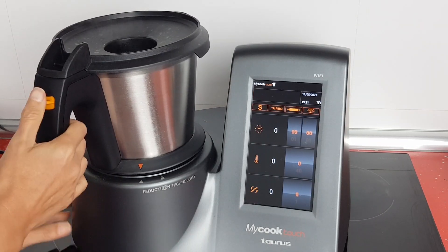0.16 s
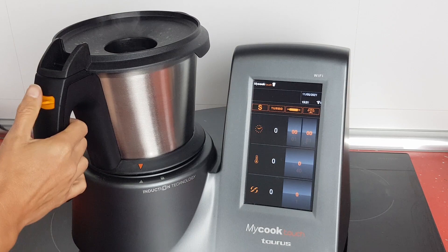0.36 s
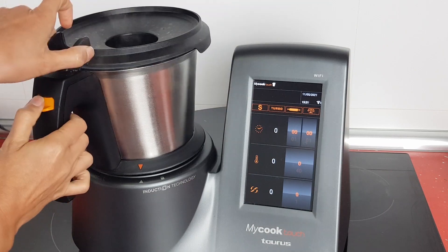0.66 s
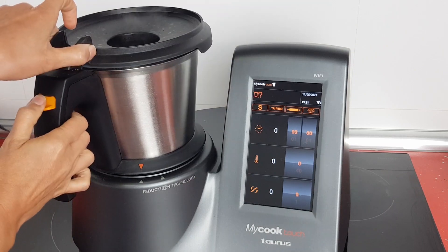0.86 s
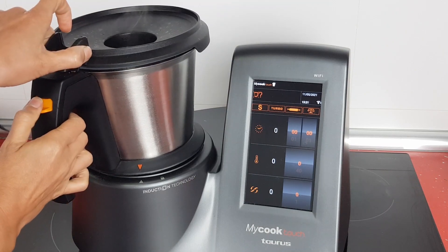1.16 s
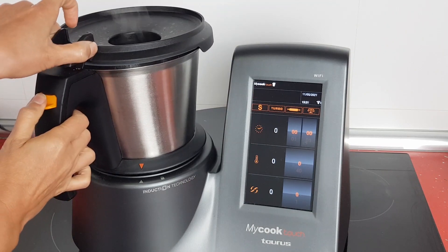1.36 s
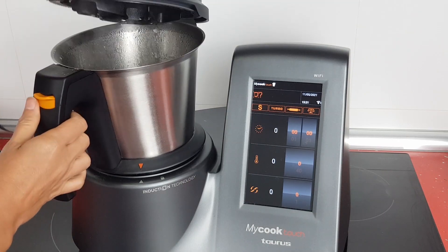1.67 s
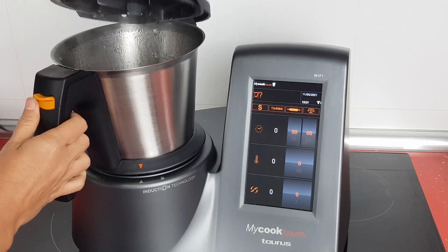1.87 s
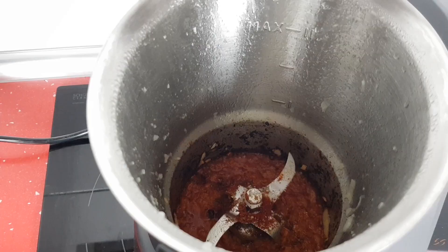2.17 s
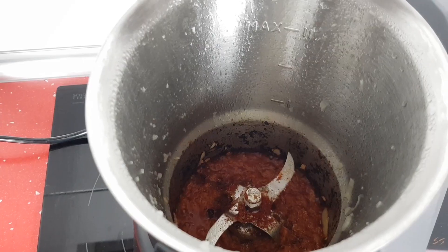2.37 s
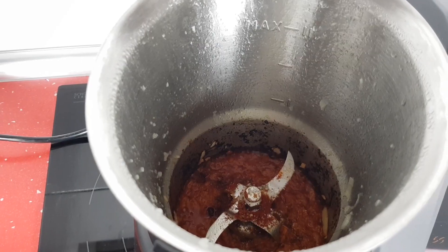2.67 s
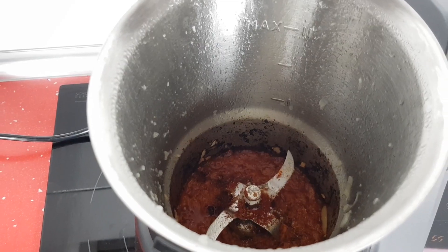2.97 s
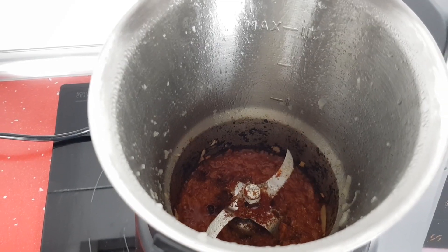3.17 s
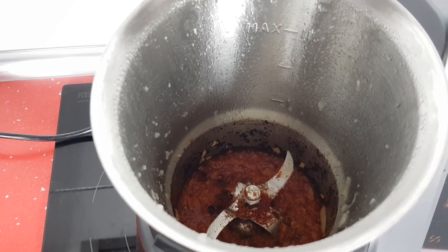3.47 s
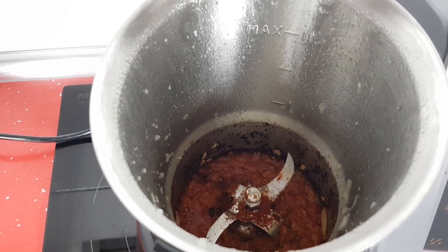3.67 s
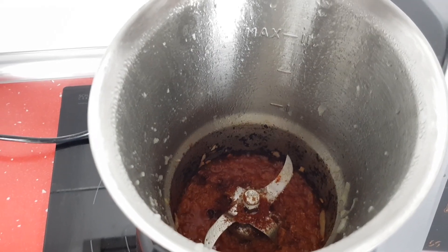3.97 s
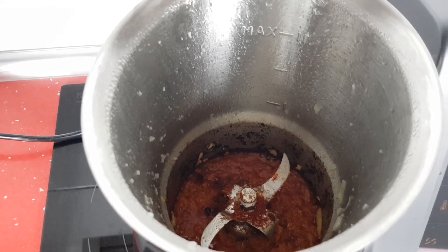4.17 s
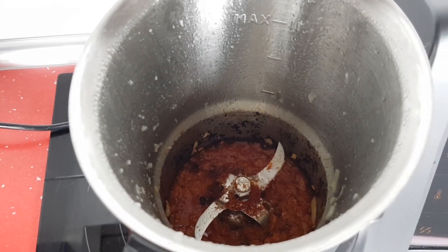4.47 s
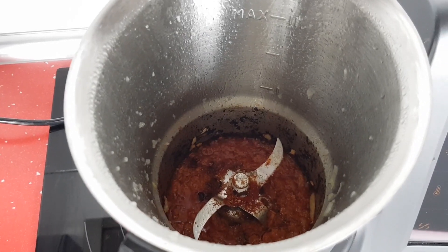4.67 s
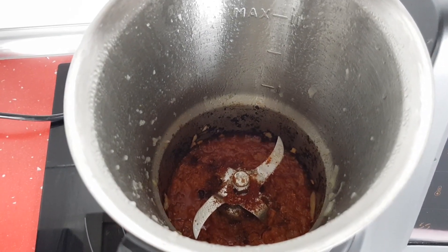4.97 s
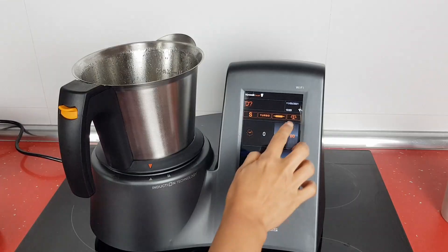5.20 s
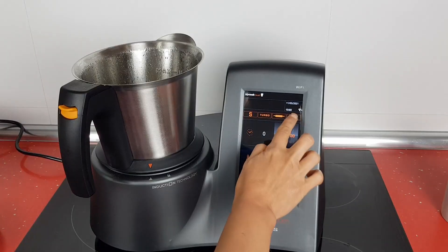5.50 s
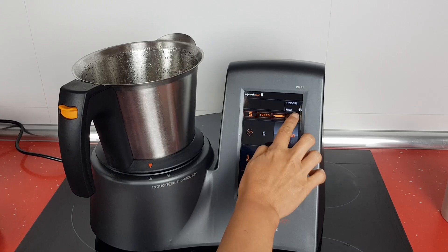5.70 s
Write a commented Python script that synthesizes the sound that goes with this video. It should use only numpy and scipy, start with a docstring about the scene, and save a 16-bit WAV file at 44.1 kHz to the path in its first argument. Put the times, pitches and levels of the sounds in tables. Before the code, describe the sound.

Oil sizzles from the start inside a lidded steel cooker jug, thin and hollow, with a faint airy hum. In the first half second fingers rub the plastic, a catch snaps several times around 0.3 seconds, and the machine thumps softly on the counter. At about 1.4 seconds the lid loosens: the sizzle grows fuller and the hum rises in pitch. The plastic lid gives a sharp, briefly ringing clack at 1.7 seconds, and the oil spits at 1.9. From 2.2 seconds the open jug fizzes evenly, with light handling bumps. At 3.2 seconds the frying becomes closer and louder, heard right over the rim, full of tiny high pops and short hisses of thrown oil. The strongest spit comes just after 5 seconds. At 5.2 seconds the sound drops abruptly to a very faint, distant sizzle that lasts until the end, near 6 seconds.

```python
"""Onion and paprika sizzle in oil in a hot steel jug; a hand works the catch and lifts the plastic lid.
Steam bubbles burst in the oil: tiny ones fuse to a fizz, big ones spit, the biggest throw hissing oil.
The steel wall colours the sizzle, and the jug's air hums at a pitch that rises as the lid opens.
Fingers rub the plastic and shake the machine on the counter; the struck handle and lid ring briefly.
The jug is heard from five places in turn: lid on, lid lifting, open, right over the rim, and far off."""
import sys
import numpy as np
from scipy import signal
from scipy.fft import rfft, irfft
from scipy.io import wavfile

SR = 44100
rng = np.random.default_rng(int(sys.argv[2]) if len(sys.argv) > 2 else 0)


def master_out(mix):
    """Clip the mix to full scale and print it as 16-bit PCM to the path in sys.argv[1]."""
    frames = np.transpose(np.atleast_2d(mix))
    ceiling = np.clip(frames, -1, 1)
    pcm = np.round(ceiling * 32767).astype(np.int16)
    wavfile.write(sys.argv[1], SR, pcm)


N = 257544
TIME = np.arange(N) / SR
PAN = np.array([[.5], [-.5]])   # splits a level difference between left and right


def from_db(db):
    """Amplitude ratio of a level in decibels."""
    return 10 ** (np.asarray(db) / 20)


def unit_rms(x):
    """Normalisation to an rms of 1."""
    return x / np.sqrt(np.mean(x ** 2) + 1e-20)


def band(x, low_hz, high_hz):
    """Butterworth band-pass filtering."""
    return signal.sosfilt(signal.butter(2, [low_hz, high_hz], "band", fs=SR, output="sos"), x)


def on_bins(points, size):
    """Interpolation over log frequency onto the bins of a Fourier transform."""
    hz, values = np.transpose(points)
    return np.interp(np.log(np.fft.rfftfreq(size, 1 / SR) + 1), np.log(hz), values)


def coloured(x, spectrum, balance=((1, 0), (2, 0))):
    """Spectral shaping with a frequency-dependent left-right balance."""
    size = x.shape[-1]
    gain_db = on_bins(spectrum, size) + on_bins(balance, size) * PAN
    return irfft(rfft(x) * from_db(gain_db), size)


# likeness of the two channels: (frequency [Hz], correlation [1])
FIELD_COHERENCE = [(60, 0.87), (150, 0.64), (380, 0.77), (950, 0.8), (2380, 0.055), (5980, 0.0038),
                   (15000, 0.0091)]
def stereo_noise(size, coherence=FIELD_COHERENCE):
    """Partial coherence: white noise, alike in both channels in the bass and unrelated in the treble."""
    mid, side = rfft(rng.standard_normal((2, size)))
    alike = np.clip(on_bins(coherence, size), 0, 1)
    return unit_rms(irfft(np.sqrt(1 + alike) * mid + np.sqrt(1 - alike) * side * [[1], [-1]], size))


def drift(rate_hz):
    """Random modulation: low-passed noise of rms 1."""
    pole = np.exp(-2 * np.pi * rate_hz / SR)
    return unit_rms(signal.lfilter([1], [1, -2 * pole, pole * pole], rng.standard_normal(N + SR))[SR:])


def ring(clicks, hz, t60):
    """Damped oscillator: each impulse starts a decaying sine."""
    r, w = from_db(-60 / (t60 * SR)), 2 * np.pi * hz / SR
    return signal.lfilter([0, np.sin(w)], [1, -2 * r * np.cos(w), r * r], clicks + 1e-18)


JUG_T60_S, JUG_ECHO_DB = .028, -21.5
def echoes(x, t60, level_db):
    """Reverberation: the direct sound and a dense, exponentially decaying tail of reflections."""
    age = np.arange(SR // 2) / SR
    tail = stereo_noise(SR // 2) * from_db(level_db - 60 * age / t60) * (age > .0008)
    tail[:, 0] = 1
    return signal.fftconvolve(x * np.ones((2, 1)), tail, axes=1)[:, :N]


# listening places: (start [s], lone bubble rate [1/s], their level over the fizz [dB],
# weight of the wall's resonances [1], sizzle level [dB])
PLACES = [(0, 180, -10, 3.4, -40), (1.439, 800, -11.5, 1.6, -38.5), (2.236, 160, -27, 0.9, -39.5),
          (3.172, 250, -3.5, 0.84, -34), (5.214, 92, -22, 0.36, -63.5)]
LIFTING_S, OPEN_S, RIM_S, FAR_S = (place[0] for place in PLACES[1:])
def per_place(table):
    """Step functions: the columns of a table with one row a place, at every sample."""
    starts = np.round(np.array(PLACES)[:, 0] * SR)
    return np.array(table)[np.searchsorted(starts, np.arange(N), side="right") - 1].T


def lone_bubbles(per_s):
    """Impulse excitation: bubbles burst in random clumps, each ringing a few cycles at its own pitch."""
    sizes = from_db(2.5 * np.minimum(rng.exponential(1, N), 2.4)) * rng.choice([-1, 1], N)
    clicks = sizes * (rng.random(N) < per_s * from_db(5 * drift(12)) / SR)
    pitches_hz = np.linspace(5500, 15000, 14)
    pitch_index = rng.integers(0, len(pitches_hz), N)
    rings = sum(ring(clicks * (pitch_index == k), hz, t60=.0018) for k, hz in enumerate(pitches_hz))
    return unit_rms(echoes(rings + .21 * np.diff(clicks, prepend=0), JUG_T60_S, JUG_ECHO_DB))


# peaks and a dip of the steel wall: (frequency [Hz], bandwidth [Hz], gain at weight 1 [dB])
WALL_RESONANCES = [(3420, 150, 3.5), (3745, 154, 3.5), (4115, 150, 5), (4420, 130, 3.5), (6260, 130, 2.5),
                   (7390, 310, 1.5), (11970, 700, 1), (15600, 150, -4)]
def steel_wall(x, weight):
    """Resonant transmission: the wall lifts or swallows sound at its own frequencies."""
    hz = np.fft.rfftfreq(x.shape[-1], 1 / SR)
    gain_db = sum(db / (1 + (2 * (hz - centre) / width) ** 2) for centre, width, db in WALL_RESONANCES)
    return irfft(rfft(x) * from_db(weight * gain_db), x.shape[-1])


def loose_lid(lift_s=1.5, takes_s=.2):
    """Cover by the loosened lid: 0 while latched, then 1, falling to 0 as it comes off."""
    return np.clip(1 - (TIME - lift_s) / takes_s, 0, 1) * (TIME >= LIFTING_S)


def sag_db(from_s=4.964, db_per_s=24, drop_s=.01):
    """Exponential decay: the frying sags, and the sound fades out over the last 10 ms before the far place."""
    drop = np.clip(1 - (FAR_S - TIME) / drop_s, 0, 1)
    return -(db_per_s * np.maximum(TIME - from_s, 0) + 20 * drop) * (TIME < FAR_S)


# sizzle spectrum at each place: (frequency [Hz], relative spectral density [dB])
LID_ON_SPECTRUM = [(24, -64.5), (40, -29), (200, -23.5), (290, -35.5), (410, -31), (1000, -38), (1290, -18),
                   (1600, -34.5), (2600, -36.5), (2790, -55), (3130, -35), (3330, -29), (3800, -32),
                   (4310, -47), (4600, -22), (5500, -21.5), (10500, -17.5), (15700, -12.5)]
LIFTING_SPECTRUM = [(24, -47.5), (40, -23), (80, -15), (295, -30.5), (400, -7), (590, -20.5), (655, -16),
                    (742, -25), (1290, -12.5), (1550, -22), (1730, -10), (1900, -15), (2170, -8),
                    (2540, -27.5), (2840, -12.5), (3060, -25), (3300, -14), (4100, -21.5), (4500, -14.5),
                    (5300, -11.5), (5640, -19), (6150, -10.5), (6630, -18), (7000, -14.5), (10000, -14.5),
                    (15700, -8)]
OPEN_SPECTRUM = [(24, -69), (40, -16), (318, -26), (369, -12), (474, -6), (578, -18), (655, -6.5),
                 (800, -22.5), (1190, -16.5), (1690, -6.5), (2030, -5), (2500, -11.5), (3050, -6),
                 (3480, -13.5), (4150, -9), (15600, -1.5)]
RIM_SPECTRUM = [(24, -50.5), (40, -28), (80, -17.5), (203, -28.5), (318, -21.5), (462, -6.5), (510, -8),
                (550, -8), (1110, -23), (1320, -11), (3490, -16), (6350, -8), (9010, -11.5), (12500, -0.5),
                (15600, -6.5)]
FAR_SPECTRUM = [(24, -44), (40, -13.5), (101, -14), (136, -26), (230, -23), (351, -26), (450, -11),
                (623, -30), (2460, -30.5), (3580, -37), (5900, -29), (6250, -25.5), (15600, -27)]
# sizzle balance, one list a place: (frequency [Hz], left minus right [dB])
BALANCES = [
    [(60, -2), (380, 3), (2380, 1.5), (15000, 1.5)],
    [(60, -6), (380, 7.5), (2380, -0.5), (15000, 2.5)],
    [(60, -3), (380, 4.5), (2380, 0.5), (15000, 1.5)],
    [(60, 2.5), (240, 1.5), (950, 2.5), (3770, 2.5), (15000, -5)],
    [(60, -2), (380, 8.5), (2380, 0), (15000, 3)],
]
def sizzle(loose_lid_db=-1):
    """Superposition: tiny bubbles fuse to a fizz, lone ones stand out; both are filtered per place."""
    edges = [round(place[0] * SR) for place in PLACES] + [N]
    start_s, per_s, lone_db, _, level_db = per_place(PLACES)
    flutter_db = np.where(start_s == RIM_S, 1.6, .6)   # steadier from afar
    fizz = stereo_noise(N) * from_db(flutter_db * drift(13))
    source = fizz + from_db(lone_db) * lone_bubbles(per_s)
    spectra = [LID_ON_SPECTRUM, LIFTING_SPECTRUM, OPEN_SPECTRUM, RIM_SPECTRUM, FAR_SPECTRUM]
    out = np.zeros((2, N))
    for k, spectrum in enumerate(spectra):
        part = slice(edges[k], edges[k + 1])
        through_wall = steel_wall(source[:, part], weight=PLACES[k][3])
        out[:, part] = unit_rms(coloured(through_wall, spectrum, BALANCES[k]))
    return out * from_db(level_db + loose_lid_db * loose_lid() + sag_db())


# air modes, one row a place: (lowest mode [Hz], level [dB], upper mode [Hz], level [dB])
AIR_MODES = [(263.9, -56, 1280, -60), (386.5, -52.5, 1290, -60), (470, -64.5, 1900, -61),
             (454, -56, 2070, -61.5), (460, -75, 4600, -88)]
# their widths, first lidded or far off, then near the open jug: (lowest mode [Hz], upper mode [Hz])
AIR_WIDTHS = ((15, 20.4), (30, 94))
def jug_air(glide_dip_db=-10):
    """Cavity resonance: two air modes hum as narrow-band noise; the lowest rises as the lid lifts."""
    low_hz, low_db, upper_hz, upper_db = per_place(AIR_MODES)
    cover = loose_lid()
    low_hz = low_hz + cover * (AIR_MODES[0][0] - low_hz)
    low_db = low_db + glide_dip_db * np.sin(np.pi * cover) ** 2
    narrow = (TIME < OPEN_S) | (TIME >= FAR_S)
    out = np.zeros(N)
    for hz, level_db, narrow_hz, wide_hz in zip((low_hz, upper_hz), (low_db, upper_db), *AIR_WIDTHS):
        phase = 2 * np.pi * np.cumsum(hz) / SR
        in_phase, quadrature = (np.where(narrow, drift(narrow_hz), drift(wide_hz)) for _ in range(2))
        out += from_db(level_db + sag_db()) * (in_phase * np.cos(phase) + quadrature * np.sin(phase))
    return out


def envelope_db(peak_s, level_db, swell_db_per_s, fade_db_per_s):
    """Exponential growth and decay of several events; the loudest at each instant counts."""
    age = TIME[:, None] - peak_s
    return np.max(level_db - np.maximum(-age * swell_db_per_s, age * fade_db_per_s), axis=1)


# a hand on the handle, the lid, the lid set aside, then near the open jug: (start [s], end [s])
GRIPS = [(0, .536), (1.44, 1.97), (2.235, 2.7), (3.172, 5.2)]
# thump and rub spectra, three of each: (frequency [Hz], relative spectral density [dB])
THUMP_SPECTRA = [
    [(21, -29), (36, -3.5), (66, 3.5), (130, -11), (151, -19), (178, -2.5), (232, -17), (260, 2),
     (340, -38), (570, -120)],
    [(21, -29), (36, -2), (59, 3), (96, -3), (123, -13.5), (215, 1.5), (260, -13), (340, -46), (570, -120)],
    [(21, -49), (36, -26), (97, 3.5), (146, -2), (178, -18), (260, -16.5), (340, -44.5), (570, -120)],
]
RUB_SPECTRA = [
    [(110, -66.5), (180, -22), (322, -5), (375, -11), (795, -17.5), (1150, -15), (1450, -15.5),
     (1660, -9.5), (2920, -24), (7000, -30.5), (9100, -29), (15400, -120)],
    [(110, -53), (180, -48), (337, -10), (387, 5.5), (502, -10), (642, -2), (795, -9.5), (1300, -5.5),
     (2470, -19.5), (7000, -13.5), (9100, -35), (15400, -120)],
    [(120, -44), (200, -18.5), (274, -20), (465, -1.5), (744, -12), (1030, -9.5), (1390, -20.5),
     (1600, -12.5), (2080, -48), (3520, -120)],
]
# likeness of the channels for handling noise: (frequency [Hz], correlation before clipping to 0..1 [1])
HAND_COHERENCE = [(60, 0.95), (400, 0.93), (950, 0.051), (3770, -0.15), (15000, -1.4)]
# fingers slip on the plastic: (time [s], level [dB], fade [dB/s])
SLIPS = [(0, -40.5, 171), (0.069, -39.5, 150), (0.194, -42, 42), (0.237, -35.5, 56), (0.261, -28.5, 244),
         (0.298, -28, 294), (.33, -33.5, 116), (.504, -47, 253), (1.463, -51, 94), (1.689, -25, 338.5),
         (1.722, -33.5, 145), (1.83, -45.5, 150), (2.236, -45, 44), (2.35, -47.5, 39), (2.587, -53, 94)]
# the machine shakes the counter: (time [s], level [dB], swell [dB/s], fade [dB/s])
SHAKES = [(.05, -59.5, 30, 18), (.26, -53, 1503, 30), (.436, -33.5, 77, 260), (.504, -39.5, 432, 277.5),
          (1.464, -43.5, 900, 113), (1.744, -45.5, 350, 70), (1.832, -42, 100, 193), (2.237, -48, 902, 140),
          (2.327, -54, 192, 400), (2.45, -59, 27, 70), (2.587, -66, 400, 200), (3.25, -72, 100, 67),
          (3.95, -68, 300, 200), (4.63, -65, 300, 61.5)]
def hands():
    """Friction and structure-borne sound: fingers rub the plastic unevenly and shake the machine."""
    slip_s, level_db, fade = np.transpose(SLIPS)
    rub_gain = from_db(envelope_db(slip_s, level_db, 5000, fade) + 2 * drift(49))
    thump_gain = from_db(envelope_db(*np.transpose(SHAKES)))
    out = np.zeros((2, N))
    for (start_s, end_s), colour in zip(GRIPS, (0, 1, 2, 2)):
        part = slice(round(start_s * SR), round(end_s * SR))
        size = part.stop - part.start
        even_size = size // 2 * 2 + 2
        thump = unit_rms(coloured(stereo_noise(even_size, HAND_COHERENCE), THUMP_SPECTRA[colour]))
        rub = unit_rms(coloured(stereo_noise(even_size, HAND_COHERENCE), RUB_SPECTRA[colour]))
        out[:, part] = thump_gain[part] * thump[:, :size] + rub_gain[part] * rub[:, :size]
    return out


def struck_plastic(blows, modes, rattle_t60):
    """Modal vibration: each blow excites every mode with a strength of its own and rattles on briefly."""
    time_s, blow_db, treble_db = np.transpose(blows)
    onsets = np.round(time_s * SR).astype(int)
    scatters_db = rng.normal(0, 2, (len(onsets), len(modes)))
    rattle = (rng.random(N) < 1500 / SR) * rng.standard_normal(N)
    out = np.zeros(N)
    for (hz, mode_db, t60), scatter_db in zip(modes, scatters_db.T):
        clicks = np.zeros(N)
        clicks[onsets] = from_db(blow_db + mode_db + scatter_db - 16 + treble_db * (hz > 3500))
        rattle_gain = signal.lfilter([1], [1, -from_db(-60 / (rattle_t60 * SR))], clicks)
        out += ring(clicks + .12 * rattle_gain * rattle, hz, t60)
    return out


# snaps of the catch: (time [s], relative level [dB], gain above 3.5 kHz [dB])
CATCH_SNAPS = [(0.193, -33, -17.5), (0.234, -42, -9.5), (0.261, -12.5, -19), (0.2945, -9, -17),
               (0.327, -15.5, -19)]
# modes of the handle: (frequency [Hz], relative level [dB], T60 [s])
HANDLE_MODES = [(195, -28, 0.086), (260, -6, 0.14), (324, -4, 0.19), (481, -12, 0.076), (846, -1, 0.02),
                (1150, 0, 0.026), (1634, -3, 0.042), (2140, -7, 0.052), (2240, -6.5, 0.018),
                (4030, 17, .004), (6500, 3, 0.0027)]
def catch():
    """Impact excitation: the snapping catch sets the handle ringing."""
    return struck_plastic(CATCH_SNAPS, HANDLE_MODES, rattle_t60=.075)


# knocks of the lid: (time [s], relative level [dB], gain above 3.5 kHz [dB])
LID_KNOCKS = [(1.442, -32, -16), (1.6888, -18, 16.5), (1.6925, -14, -3), (1.7065, -16, -4),
              (1.779, -26.5, -15), (2.233, -34, -30)]
# modes of the lid: (frequency [Hz], relative level [dB], T60 [s])
LID_MODES = [(392, -27.5, .07), (485, -31, 0.06), (659, -4.5, 0.13), (1281, -7.5, 0.15),
             (1830, -3.5, 0.033), (2320, -0.5, 0.016), (4200, -6.5, 0.018), (4760, -2, 0.0065),
             (6270, 6.5, 0.0019), (10800, 0.5, 0.0018), (14200, -12, 0.002)]
def lid():
    """Free vibration: the lid rings after each knock on the rim."""
    return struck_plastic(LID_KNOCKS, LID_MODES, rattle_t60=.018)


# loud bursts: (time [s], note level [dB], pitch [Hz], left minus right [dB],
# relative crack level [dB], right-channel delay [us])
LOUD_BURSTS = [(1.9254, -21.5, 8500.0, 4, -12, -10.0), (1.9288, -15.5, 14400, 5, -22, 17),
               (3.1766, -16, 12000, -1, -16, 2), (3.2108, -20, 7100, -4, -16, 110.0),
               (3.2884, -11, 12700, -7.0, -16, 190.0), (3.3546, -15, 12500.0, -10, -25, 186),
               (3.3619, -16, 12100.0, -4, -33, 210.0), (3.4025, -12, 10500, 1, -14.5, 210.0),
               (3.4107, -8.5, 11100, 1, -18, -24), (3.4541, -20, 13100, -15, -25, 34),
               (3.4851, -15.5, 11700, 8.0, -26.0, -20.0), (3.5505, -19, 11500.0, 2.0, -24, 60.0),
               (3.5603, -11, 12100.0, -1, -20, 205), (3.5792, -10, 11400, -6, -18, 173),
               (3.5985, -18.5, 10100, -5, -14, 30.0), (3.6869, -8.5, 15100, 0, -20, 189),
               (3.7041, -21, 11600, 4, -32, 118), (3.8409, -17.5, 12500, 6, -14, 183),
               (3.8494, -15, 12800.0, -2.0, -16, 110.0), (3.8851, -13.5, 12900, -7, -32.0, 20.0),
               (3.9207, -15, 13400, -14, -28, 226), (3.9267, -14, 13250, -7, -17, 237),
               (3.9808, -18.5, 6500.0, -1, -11, 116), (3.9935, -14, 12200, -1.0, -23, 170.0),
               (4.0024, -14, 12800, -6.0, -22, 20.0), (4.0166, -13, 12100.0, 2.0, -31, 106),
               (4.0268, -11, 12000, 8, -20, 28), (4.0395, -5, 13660, 2, -21, 120),
               (4.1245, -13, 12000, -3, -23.0, 23), (4.1378, -12, 13100, -8, -17, 130.0),
               (4.1462, -13, 12800.0, 2, -20, 170.0), (4.2597, -14, 12900, -2, -24, 90.0),
               (4.2852, -16, 12400.0, -3, -16, 172), (4.3168, -20, 7000.0, -2.0, -12, 110.0),
               (4.3859, -9.5, 11700, -3.0, -30, 87), (4.4357, -13.5, 13000, -6.0, -28.0, 130.0),
               (4.4603, -12, 13500.0, -4, -25.0, -38), (4.4879, -14, 7200, 2, -9.5, 152),
               (4.5412, -14.5, 12700.0, -2, -19, 7), (4.5565, -23, 12100.0, 4, -16, -30.0),
               (4.6539, -15, 12300, 2, -16, 77), (4.7038, -16, 14800, 1, -6, 185),
               (4.7539, -8, 12200.0, -3, -17, 178), (4.7654, -15, 13500, -1, -18, 47),
               (4.8149, -18.5, 7200, -3, -13, 108), (4.8631, -15.5, 12850, 3, -16, 150.0),
               (4.8755, -18, 11500.0, -2, -25.0, 65), (4.8871, -15.5, 11700.0, -3, -11, 132),
               (4.9592, -16.5, 12200.0, 5.5, -10.5, 110.0), (5.0155, -16, 12500.0, -5, -18, 100.0),
               (5.0229, -18.5, 12200.0, -5, -23, 170.0), (5.0465, -16.5, 10600, 5, -10.5, 110.0),
               (5.049, -14, 12500, -2, -26, 110.0), (5.0585, -19, 14000.0, -3.0, -12, 26),
               (5.0709, -22.0, 11500, -15, -25, 120.0), (5.0774, -1.5, 11850, 2, -43, -10),
               (5.0787, -2.5, 12600, -11, -42, 189), (5.0804, -7.5, 12100, -2, -37, 6),
               (5.0865, -10, 12500.0, -8.0, -34, -10.0), (5.0985, -21, 12500, -8, -28, -8),
               (5.1538, -16.5, 12100, -1, -28.0, 17), (5.1655, -19, 12000.0, -1, -26, 60.0),
               (5.178, -17, 13200.0, -1, -30, 60.0), (5.1971, -10, 11900, 0, -21.5, 47)]
# smaller bursts, at random over the rim: the same columns without the time
SMALL_MEAN, SMALL_SPREAD = (-24, 12300, -3, -26, 100), (2.5, 1600, 4.5, 4, 80)
def bursts(small_count=150, lead_s=.0002, length=1500):
    """Film rupture: a big bubble spits a note that rises as it opens, with spray, a crack and a click."""
    small_s = rng.uniform(RIM_S, FAR_S, small_count)
    small_traits = rng.normal(SMALL_MEAN, SMALL_SPREAD, (small_count, len(SMALL_MEAN)))
    rows = np.vstack([LOUD_BURSTS, np.column_stack([small_s, small_traits])])
    noise = rng.standard_normal((len(rows), 2, 2, length))
    sprays, cracks = band(noise[:, 0], 8800, 15500), band(noise[:, 1], 3500, 11000)
    since = TIME[:length]
    click = band(2. * (since == 0), 1550, 14000)   # the film tears
    out = np.zeros((2, N + length))
    for (time_s, level_db, hz, pan_db, crack_db, delay_us), spray, crack in zip(rows, sprays, cracks):
        bigness = from_db(level_db + 14.5)
        rise_s = .00024 * bigness ** .15   # bigger bubbles take longer to open
        age = np.maximum(since - np.array([[0], [delay_us * 1e-6]]) - lead_s, 0)
        envelope = (age / rise_s * np.exp(1 - age / rise_s)) ** 2
        note = np.sin(2 * np.pi * hz * age * (.991 + 40 * age))
        spit = .36 * unit_rms(envelope * spray) + from_db(crack_db + 1.5) * unit_rms(envelope * crack)
        pop = envelope * note + np.sqrt(np.mean(envelope ** 2)) * spit
        pop /= np.abs(pop).max(axis=1).mean()
        clicks = np.array([np.roll(click, start) for start in np.argmax(age > 0, axis=1)])
        tear = from_db(crack_db + 8) * clicks
        sputter_envelope = (1 - np.exp(-age / rise_s)) * np.exp(-age / .0025)
        sputter = .018 * bigness ** .5 * unit_rms(spray) * sputter_envelope
        at = round((time_s - lead_s - rise_s) * SR)
        out[:, at:at + length] += from_db(level_db + pan_db * PAN) * (pop + tear + sputter)
    return echoes(out[:, :N], JUG_T60_S, JUG_ECHO_DB) * (TIME < FAR_S)


# oil thrown by big bursts: (time [s], level [dB], T60 [s])
SPATTERS = [(1.925, -31, 0.17), (3.579, -29.5, 0.16), (4.04, -19, 0.034), (5.0763, -21.5, 0.16)]
def spatter():
    """Exponential decay: thrown droplets fry off in a bright, grainy hiss."""
    time_s, level_db, t60 = np.transpose(SPATTERS)
    gain = from_db(envelope_db(time_s, level_db, 50000, 60 / t60) + 2.1 * drift(399))
    hiss = unit_rms(band(rng.standard_normal((2, N)), 9000, 15500))
    return gain * hiss * (TIME < FAR_S)


def scene(lag_samples=5):
    """Superposition at two microphones; sizzle, hum and handling reach the right one a little later."""
    plastic = catch() + lid()
    frying = sizzle() + jug_air()
    handling = hands() + echoes(plastic, t60=.3, level_db=-28.5)   # the kitchen's reverberation
    left, right = frying + from_db(.8 * PAN) * handling   # the hands work on the left
    late_right = np.concatenate([right[:lag_samples], right[:-lag_samples]])
    return np.array([left, late_right]) + bursts() + spatter()


def record(dry, ceiling=.85, cutoff_hz=15720):
    """Soft saturation rounds off the loudest spits; a steep low-pass cuts the top."""
    rounded = ceiling * np.tanh(dry / ceiling)
    return signal.sosfilt(signal.ellip(12, .3, 65, cutoff_hz, fs=SR, output="sos"), rounded)


dry = scene()
out = record(dry)
master_out(out)
```